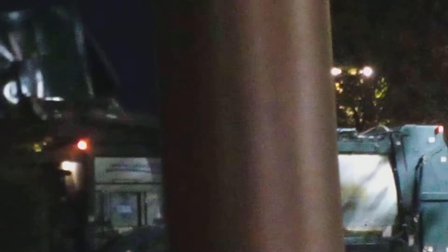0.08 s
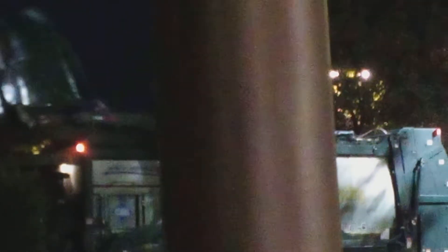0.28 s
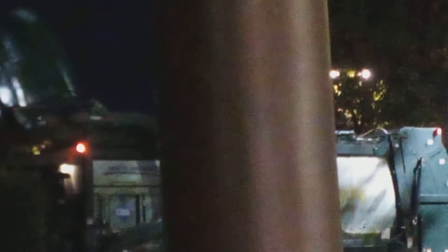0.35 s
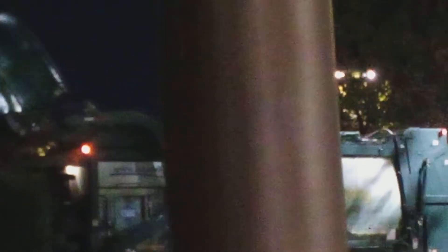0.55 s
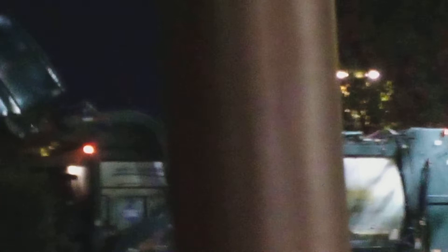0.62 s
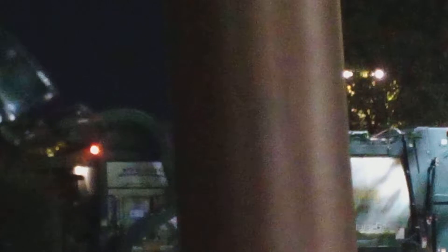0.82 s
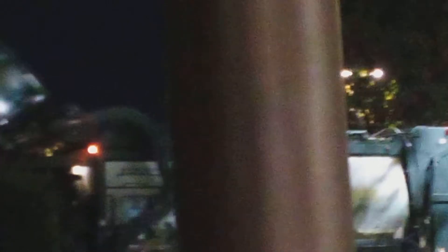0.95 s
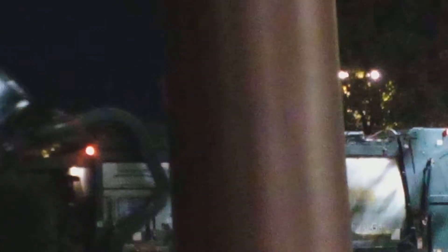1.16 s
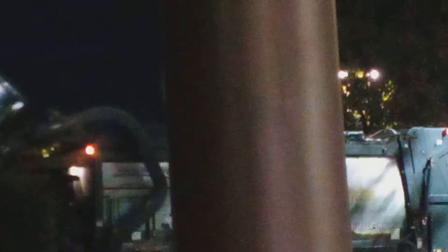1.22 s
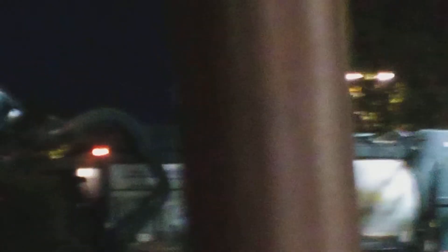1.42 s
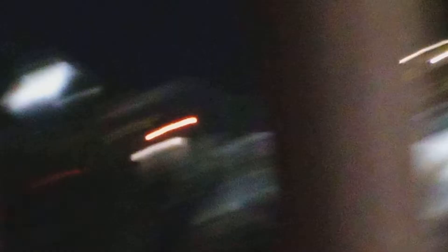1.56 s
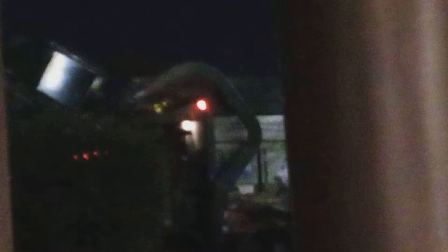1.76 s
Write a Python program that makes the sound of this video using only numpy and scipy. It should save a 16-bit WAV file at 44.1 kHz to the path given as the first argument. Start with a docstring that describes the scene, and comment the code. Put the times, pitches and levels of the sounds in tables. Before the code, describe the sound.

Metal clanks and a hollow rumble as an idling garbage truck empties a bin.

```python
"""A garbage truck tips a bin at night, heard on one microphone from across the street.
The engine idles, its belt chirps faintly and the hydraulic pump whines. The lift arm shudders, its
steel clanks and rings, and its dry pivots squeak. The hollow bin booms against its stop and the load
tumbles into the rumbling hopper. House fronts throw the crash back."""
import sys
import numpy as np
from scipy import signal
from scipy.fft import rfft, irfft
from scipy.io import wavfile
from scipy.ndimage import uniform_filter1d

SR = 44100
rng = np.random.default_rng(int(sys.argv[2]) if len(sys.argv) > 2 else 0)


def master_out(mix):
    """Clip the mix to full scale and print it as 16-bit PCM to the path in sys.argv[1]."""
    frames = np.transpose(np.atleast_2d(mix))
    ceiling = np.clip(frames, -1, 1)
    pcm = np.round(ceiling * 32767).astype(np.int16)
    wavfile.write(sys.argv[1], SR, pcm)


N = 79380
T, HZ = np.arange(N) / SR, np.fft.rfftfreq(N, 1 / SR)

# wash of the idling engine: frequency_hz, relative_db
IDLE_SPECTRUM = [(30, -37), (60, -4.5), (125, 0), (210, -0.5), (380, -7), (500, -20), (750, -18.5),
                 (1400, -22), (2700, -21.5), (3900, -37), (6000, -36), (7800, -34), (8600, -49),
                 (15500, -59)]
# hum of the engine: pitch_hz, level_db
ENGINE_TONES = [(134, -49), (260, -55), (396, -58.5)]
# whine of the pump: time_s, pitch_hz, level_db
PUMP_WHINE = [(0, 1181, -45.5), (.08, 1184, -46), (.15, 1218, -68), (.8, 1210, -50.5), (1.08, 1207, -55.5),
              (1.18, 1177, -44.5), (1.28, 1186, -49.5), (1.32, 1177, -54.5), (1.8, 1147, -57.5)]
# shudder of the moving arm: time_s, level_db
SHUDDER_LEVEL = [(0, -35.5), (.205, -37), (.24, -83)]
# clanks of the arm and the load: start_s, clang_db, clash_db, tick_db
CLANKS = [(.004, -45.5, -44.5, -82), (0.116, -61, -51.5, -80.5), (0.191, -42.5, -49, -96),
          (0.228, -42.5, -39.5, -66.5), (0.263, -33.5, -29, -62), (0.283, -30, -52, -83),
          (0.308, -34.5, -36.5, -71), (0.463, -48, -34.5, -50.5), (0.499, -39, -27, -64),
          (0.533, -33, -28.5, -59), (0.575, -32.5, -27.5, -49.5), (0.624, -33, -29.5, -46),
          (.841, -44.5, -42, -65), (.980, -50.5, -57.5, -85), (1.056, -53, -64, -93),
          (1.145, -61, -55.5, -74), (1.421, -57.5, -56.5, -76)]
# a clank's midrange clang, bright clash and sharp tick, each: frequency_hz, relative_db
CLANG_SPECTRUM = [(400, -49), (650, -13.5), (1000, -15), (1500, -6.5), (1850, 4), (2250, -8), (2700, -3.5),
                  (3600, -6.5), (6000, -23), (9000, -76)]
CLASH_SPECTRUM = [(1500, -34.5), (3000, -15), (4000, -2.5), (5000, 9), (6500, 5), (7300, -1), (8300, -18),
                  (15000, -70)]
TICK_SPECTRUM = [(4000, -44), (7500, 3.5), (11500, 11), (13000, -5), (16000, -13)]
# broad resonances of the steel: centre_hz, width_hz, lift_db
STEEL_RESONANCES = [(607.5, 74, 5.5), (1194, 128, 7.5), (2008, 83, 4), (2572, 230, 8)]
# clear tones of the struck steel: pitch_hz
STEEL_MODES = [619, 958, 1082, 1720, 1945, 2519, 3052, 3680, 4150, 4624, 5136, 5720, 5938, 6336, 6830, 7305]
# struck parts that ring on: start_s, level_db, pitch_hz, t60_s, spread_hz
RINGING_PARTS = [(0.065, -35.5, 1735, 0.26, 230), (0.071, -46, 4097, .17, 30), (.185, -40, 1910, 0.49, 60),
                 (.265, -35, 7290, 0.069, 90), (0.286, -28, 1730, 0.093, 170),
                 (0.304, -52, 11200, 0.081, 110), (0.314, -38.5, 1240, 1, 30), (0.375, -37.5, 1990, 1, 100),
                 (0.498, -23.5, 6400, 0.12, 330), (.507, -32, 1070, 0.15, 70), (.532, -26, 6450, .08, 250),
                 (0.63, -30, 788, 0.6, 110), (.636, -32, 620, 0.38, 25), (1.056, -53.5, 5168, 0.11, 130)]
# squeaks of the arm's pivots: start_s, length_s, pitch_hz, level_db
SQUEAKS = [(0.12, 0.15, 2620, -47.5), (1.677, 0.22, 1670, -54.5), (1.721, 0.042, 2600, -57)]
# clatter of the sliding load: time_s, level_db
TUMBLE_LEVEL = [(.23, -67), (.30, -45.5), (.455, -38.5), (.49, -29), (.57, -28), (.615, -32.5), (.645, -28),
                (.70, -29), (.75, -35.5), (.80, -49.5), (1.05, -50.5), (1.3, -51)]
# colour of that clatter: frequency_hz, relative_db
TUMBLE_SPECTRUM = [(300, 5), (470, -8), (610, 4.5), (850, 1.5), (1300, -2), (2000, -2.5), (3000, -10),
                   (5800, -5.5), (7500, -48), (15000, -63)]
# rumble of the hopper: time_s, level_db
RUMBLE_LEVEL = [(.245, -42), (.28, -27.5), (.38, -27), (.46, -34), (.53, -20.5), (.66, -22), (.785, -20.5),
                (.82, -23.5), (.87, -37), (.93, -57.5)]
# colour of that rumble: frequency_hz, relative_db
RUMBLE_SPECTRUM = [(25, -34), (45, -15), (60, -3), (110, 5.5), (155, 1), (280, 6.5), (325, -5), (380, -19),
                   (480, -20.5), (800, -96)]
# hollow knocks of the bin: start_s, level_db, pitch_hz, t60_s
BIN_KNOCKS = [(0.231, -7, 247.9, 0.063), (0.258, -10.5, 266, 0.13), (0.306, -17, 233.3, 0.15),
              (.329, -12, 233, 0.11), (0.37, -15.5, 218, 0.1), (0.429, -17.5, 229, 0.043),
              (0.495, -23, 236, 0.054), (0.519, -14, 255.5, 0.034), (0.633, -16, 326, 0.041),
              (0.678, -12, 203, 0.018), (0.743, -16, 200, 0.13), (0.759, -23, 290, 0.025),
              (.781, -17, 259, 0.057), (.846, -24, 208.8, 0.14), (1.046, -32, 270, 0.11)]
# deep thuds of the hopper: start_s, level_db, pitch_hz
HOPPER_THUDS = [(0.287, -16.5, 56.4), (0.34, -16.5, 122), (0.414, -18.5, 56.4), (0.468, -17, 83),
                (0.56, -16.5, 76), (0.639, -13, 104), (0.686, -13, 101), (0.747, -18.5, 94),
                (0.779, -19.5, 93), (0.826, -15.5, 114), (.965, -27.5, 69.3), (1.052, -31.5, 73)]


def amp(db):
    """Decibels to gain."""
    return 10 ** (np.asarray(db) / 20)


def unit(x):
    """Scales to rms 1."""
    return x / np.sqrt(np.mean(x ** 2) + 1e-20)


def curve(points, column=1):
    """One column of a timed table, at every sample."""
    columns = np.transpose(points)
    return np.interp(T, columns[0], columns[column])


def filtered(x, gain):
    """Applies a gain at each frequency."""
    return irfft(rfft(x) * gain, N)


def colour(x, spectrum, lift_db=0):
    """Filters by a spectrum table plus a lift, to rms 1."""
    hz, db = np.transpose(spectrum)
    shape_db = np.interp(np.log(HZ + 1), np.log(hz), db)
    return unit(filtered(x, amp(shape_db + lift_db)))


def noise():
    """White noise."""
    return rng.standard_normal(N)


def drift(rate_hz):
    """A random wander up to about rate_hz, rms 1."""
    return unit(filtered(noise(), np.exp(-(HZ / rate_hz) ** 2)))


def uneven(width_bins):
    """Random peaks and dips along the spectrum, rms 1."""
    return unit(uniform_filter1d(rng.standard_normal(len(HZ)), width_bins))


def tone(hz, waver_hz, flutter_db, rate_hz):
    """A tone that wavers in pitch and level, rms 1."""
    phase = 2 * np.pi * np.cumsum(hz + waver_hz * drift(rate_hz)) / SR
    return unit(np.sin(phase) * amp(flutter_db * drift(rate_hz)))


def blow(start_s, rise_s, t60_s):
    """Envelope of a blow: smooth rise, exponential decay."""
    age = np.maximum(T - start_s, 0)
    attack = np.sin(np.pi / 2 * np.minimum(age / rise_s, 1)) ** 2
    return attack * amp(-60 * np.maximum(age - rise_s, 0) / t60_s)


def echoes(x, t60_s, per_s=2000):
    """Scattered reflections that reach the microphone late and die away."""
    taps = noise() * (rng.random(N) < per_s / SR) * blow(0.01, 0.017, t60_s)
    return signal.fftconvolve(x, taps / np.linalg.norm(taps))[:N]


def engine():
    """The engine idles across the street: a low wash with a wavering hum."""
    ripple_db = 3.5 * uneven(width_bins=140) * np.minimum(HZ / 1000, 1)
    wash = amp(-42.5) * colour(noise(), IDLE_SPECTRUM, ripple_db)
    hum = sum(amp(db) * tone(hz, waver_hz=7.2, flutter_db=4, rate_hz=13) for hz, db in ENGINE_TONES)
    return wash + hum


def pump():
    """The hydraulic pump whines on one unsteady pitch."""
    whine = tone(curve(PUMP_WHINE), waver_hz=15, flutter_db=3, rate_hz=60)
    return amp(curve(PUMP_WHINE, column=2)) * whine


def belt(turns_per_s=12.46, pitch_hz=3314, swing_hz=25):
    """The drive belt chirps faintly once a turn of the crankshaft, no two turns alike."""
    turn = np.cos(2 * np.pi * turns_per_s * T + drift(5) / 2)
    chirp = tone(pitch_hz + swing_hz * turn, waver_hz=18, flutter_db=2.8, rate_hz=15)
    return amp(-63) * unit((1 + turn) * chirp)


def arm_shudder():
    """The moving lift arm shakes at two low pitches."""
    lower = tone(76.2, waver_hz=4.2, flutter_db=2.5, rate_hz=31)
    upper = tone(104, waver_hz=4.2, flutter_db=1.2, rate_hz=23)
    return amp(curve(SHUDDER_LEVEL)) * (lower + amp(-5.5) * upper)


def steel_db():
    """The resonant peaks that the steel adds to whatever strikes it."""
    return sum(db / (1 + (2 * (HZ - hz) / width) ** 2) for hz, width, db in STEEL_RESONANCES)


def clanks():
    """Each clank strikes the steel's modes in its own mix: clear tones over a dense chattering decay."""
    out = np.zeros(N)
    for start, clang_db, clash_db, tick_db in CLANKS:
        lift_db = steel_db() + 5 * uneven(width_bins=130)
        chatter = noise() * amp(0.5 * drift(260))
        modes = sum(np.sin(2 * np.pi * (hz * T + rng.random())) for hz in STEEL_MODES)

        def band(spectrum, rise_s, t60_s, tonal=True):
            """One band of this clank."""
            sound = blow(start, rise_s, t60_s) * colour(chatter, spectrum, lift_db)
            if tonal:
                sound += amp(-6.5) * blow(start, rise_s, t60_s=0.16) * colour(modes, spectrum, lift_db)
            return sound

        out += amp(clang_db) * band(CLANG_SPECTRUM, rise_s=0.0039, t60_s=0.53)
        out += amp(clash_db) * band(CLASH_SPECTRUM, rise_s=0.0033, t60_s=0.28)
        out += amp(tick_db) * band(TICK_SPECTRUM, rise_s=0.0054, t60_s=0.14, tonal=False)
    return out


def ringing_parts():
    """Single parts ring when hit: a clear pitch with a rattle spread about it."""
    out = np.zeros(N)
    for start, db, hz, t60, spread in RINGING_PARTS:
        rattle = unit(filtered(noise(), np.exp(-((HZ - hz) / spread) ** 2 / 2)))
        ring = tone(hz, waver_hz=8, flutter_db=2, rate_hz=69)
        out += amp(db) * blow(start, rise_s=0.0072, t60_s=t60) * unit(ring + amp(2) * rattle)
    return out


def pivot_squeaks():
    """The arm's dry pivots sing for a moment."""
    out = np.zeros(N)
    for start, length, hz, db in SQUEAKS:
        swell = np.sin(np.pi * np.clip((T - start) / length, 0, 1))
        out += amp(db) * swell * tone(hz, waver_hz=16.7, flutter_db=4.5, rate_hz=88)
    return out


def tumbling_load(taps_per_s=900, kinds=8):
    """Many pieces of rubbish tap the steel while the hopper rumbles under them."""
    taps = rng.choice([-1., 1.], N) * (rng.random(N) < taps_per_s / SR)
    strength_db = np.minimum(rng.exponential(1, N), 4)
    taps *= amp(strength_db)
    kind = rng.integers(0, kinds, N)
    rattle = np.zeros(N)
    for k in range(kinds):
        click = noise() * blow(0, rise_s=0.00048, t60_s=0.032)
        rattle += signal.fftconvolve(taps * (kind == k), click)[:N]
    clatter = amp(curve(TUMBLE_LEVEL)) * colour(rattle, TUMBLE_SPECTRUM, steel_db())
    rumble = amp(curve(RUMBLE_LEVEL)) * colour(noise(), RUMBLE_SPECTRUM)
    return clatter + rumble


def panel(start_s, hz, rise_s, t60_s):
    """A struck panel swings at one low pitch and dies away."""
    return blow(start_s, rise_s, t60_s) * np.sin(2 * np.pi * hz * (T - start_s))


def booms(top_hz=377):
    """Panels of the bin and hopper boom at each blow, and the hollow space answers the bin's knocks."""
    knocks = sum(amp(db) * panel(start, hz, rise_s=0.0095, t60_s=t60)
                 for start, db, hz, t60 in BIN_KNOCKS)
    thuds = sum(amp(db) * panel(start, hz, rise_s=0.009, t60_s=0.078) for start, db, hz in HOPPER_THUDS)
    hollow = amp(-8.5) * echoes(knocks, t60_s=0.22)
    low_pass = (1 + (HZ / top_hz) ** 12) ** -0.5
    return filtered(knocks + thuds + hollow, low_pass)


def scene():
    """From the far kerb, in mono: the truck, the crash and its echo off the house fronts."""
    crash = clanks() + ringing_parts() + tumbling_load() + pivot_squeaks()
    truck = engine() + pump() + arm_shudder() + belt()
    direct = truck + booms() + crash
    house_fronts = amp(-15) * echoes(crash, t60_s=0.74)
    return (direct + house_fronts)[None]


def record(dry, low_cut_hz=45.3, top_hz=15700):
    """The microphone's bass cut and the recorder's band limit."""
    bass_cut = (1 + (low_cut_hz / (HZ + 1)) ** 8) ** -0.5
    band_limit = signal.firwin(511, top_hz, window=("kaiser", 9), fs=SR)
    return signal.oaconvolve(filtered(dry, bass_cut), band_limit[None], "same")


dry = scene()
out = record(dry)
master_out(out)
```